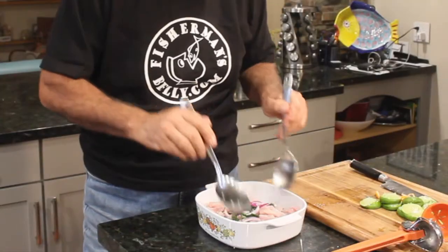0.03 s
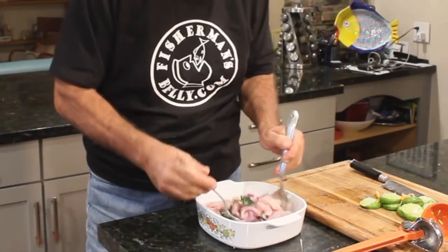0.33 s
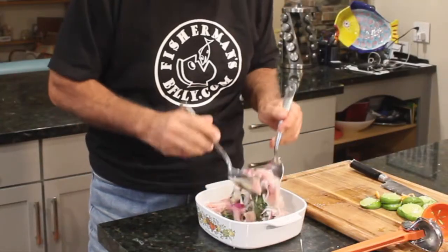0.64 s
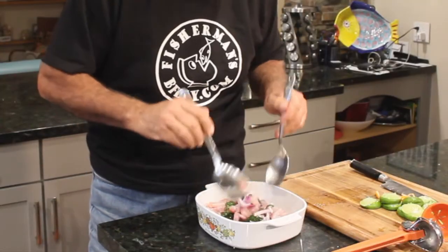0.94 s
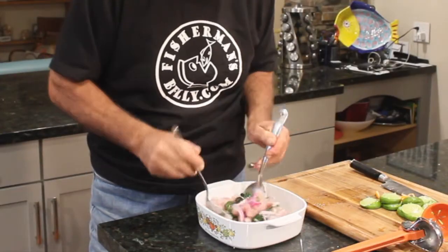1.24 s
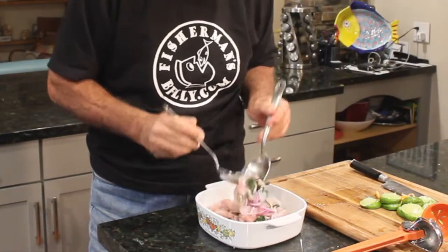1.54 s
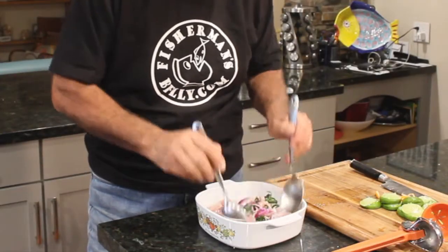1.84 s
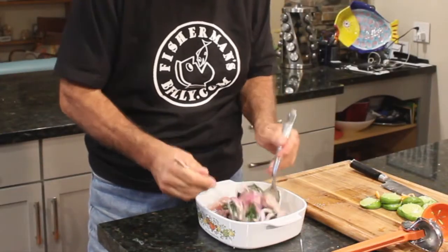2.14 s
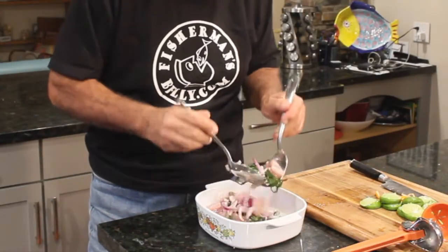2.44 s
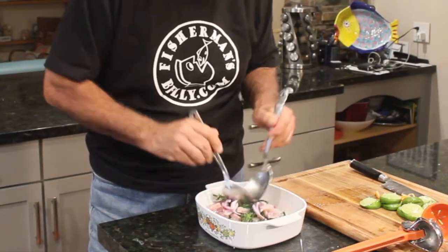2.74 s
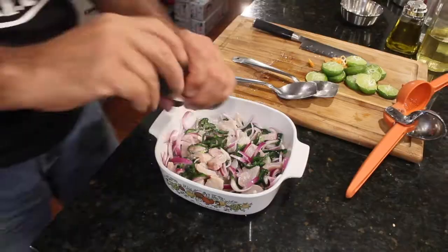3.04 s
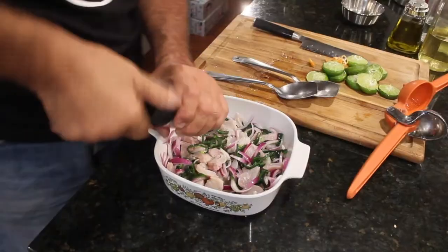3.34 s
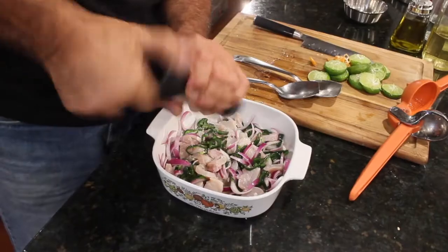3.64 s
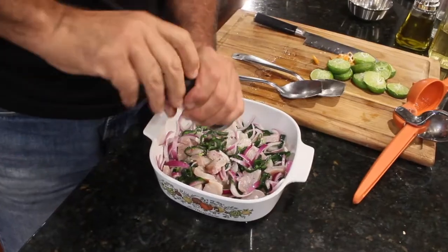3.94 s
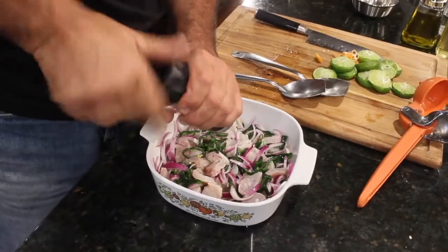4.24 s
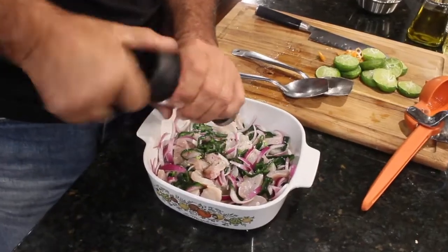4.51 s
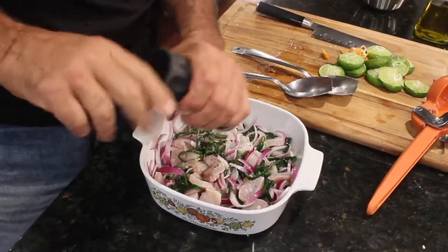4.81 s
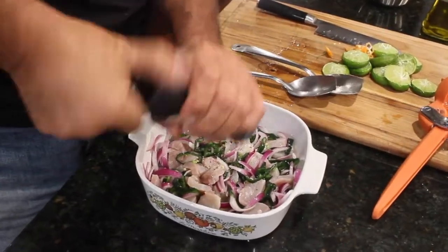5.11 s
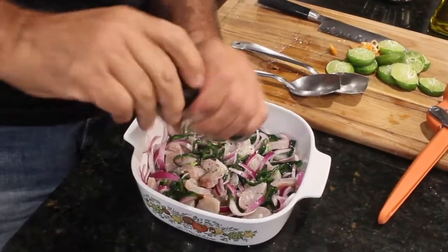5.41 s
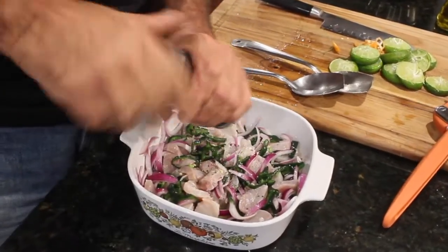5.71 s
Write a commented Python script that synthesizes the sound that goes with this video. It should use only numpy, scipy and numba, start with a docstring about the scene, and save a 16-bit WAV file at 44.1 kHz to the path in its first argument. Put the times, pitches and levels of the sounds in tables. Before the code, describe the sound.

Metal spoons toss a moist salad in a ceramic dish, heard from close by. Three sharp, ringing clinks stand out as the loudest sounds, at about 0.2, 1.1 and 1.9 seconds. The salad shifts with soft wet ticks, clearest around 0.4 seconds and fainter between 2.5 and 3 seconds.

From about 3.1 seconds a hand pepper mill is twisted six times, with further turns near 3.6, 4.1, 4.5, 5.1 and 5.5 seconds. Each twist is a brief, dry crunch with brittle snaps of peppercorns and a slightly hollow rattle from the mill. The turns vary in strength, and the last is a little softer and duller. A very faint, high patter of falling pepper follows each one. The kitchen adds a short reverberation, and quiet ventilation noise and a low electrical hum continue throughout.

```python
"""Tossing a salad and grinding pepper

Metal spoons clink three times on a ceramic dish, exciting its modes, as a moist salad is tossed.
A hand mill is then twisted six times: peppercorns fracture between its burrs and patter down.
The hard kitchen reverberates over ventilation and mains hum; a gain control ducks after each clink."""
import sys
import numpy as np
from scipy import signal
from scipy.fft import rfft, irfft
from scipy.io import wavfile
from numba import njit

SR = 44100
rng = np.random.default_rng(int(sys.argv[2]) if len(sys.argv) > 2 else 0)


def output_pcm(signal):
    """Save a mono or channel-first signal as 16-bit PCM at the path in sys.argv[1].

    Samples are clipped to [-1, 1] before scaling.
    """
    pcm = np.clip(np.atleast_2d(signal).T, -1, 1) * 32767
    wavfile.write(sys.argv[1], SR, np.round(pcm).astype(np.int16))


N = 258620
TOP_HZ = 15900  # upper band limit
# twists of the mill: start_s, length_s, bite_s, level_db, relative_shake_db, tilt_db_per_octave
TWIST_STROKES = [(3.143, 0.22, .018, -39.5, -16, -0.5), (3.605, 0.15, 0.066, -23.5, -9, 0),
                 (4.069, 0.11, 0.018, -22, -7.5, -0.2), (4.491, 0.12, 0.024, -33.5, -5, .5),
                 (5.065, 0.14, 0.021, -24.5, -11, 0.5), (5.484, 0.13, 0.043, -28, -12, -0.6)]


def undb(db):
    """Amplitude ratio: a factor of ten per 20 decibels."""
    return 10 ** (np.asarray(db) / 20)


def seconds(length_s):
    """Uniformly sampled time axis."""
    return np.arange(int(length_s * SR)) / SR


def unit(x):
    """Normalisation to an rms of 1."""
    return x / np.sqrt(np.mean(x ** 2))


def along(hz, points):
    """Interpolation of (frequency_hz, value) points on a logarithmic frequency axis."""
    point_hz, value = np.transpose(points)
    return np.interp(np.log(hz + 1), np.log(point_hz), value)


def colour(x, points, tilt_db=0, order=2048):
    """Minimum-phase filter with the given spectrum, tilted by tilt_db per octave above 1 kHz."""
    hz = np.fft.rfftfreq(order, 1 / SR)
    gain_db = along(hz, points) + tilt_db * np.log2(np.maximum(hz, 1000) / 1000)
    cepstrum = irfft(np.log(undb(gain_db)))
    cepstrum[1:order // 2] *= 2  # folding onto positive time makes the filter causal
    cepstrum[order // 2 + 1:] = 0
    response = irfft(np.exp(rfft(cepstrum)))
    return signal.fftconvolve(x, response)[:len(x)]


def fade(t, t60):
    """Exponential damping: 60 dB in t60 seconds."""
    return np.exp(-np.log(1000) * t / t60)


def swell(middle_s, half_width_s):
    """Gaussian envelope: a smooth rise and fall around a moment."""
    return np.exp(-((np.arange(N) / SR - middle_s) / half_width_s) ** 2)


def add(track, start_s, sound):
    """Superposition of a sound on a track."""
    i = int(start_s * SR)
    track[i:i + len(sound)] += sound[:N - i]


def grains(rate_hz, spread_db):
    """Shot noise: random impulses, a few larger than the rest."""
    size = undb(spread_db * np.minimum(rng.exponential(size=N), 3))
    return (rng.random(N) < rate_hz / SR) * size * rng.choice([-1, 1], N)


def background(air_db=-46):
    """Broadband ventilation noise and the mains harmonics of a kitchen appliance."""
    # spectrum of the ventilation: frequency_hz, gain_db
    air_spectrum = [(15, -39), (25, -12), (49, -12), (123, -12.5), (144, -13), (255, -7), (473, -9.5),
                    (654, -16), (981, -17), (1060, -26), (1150, -18), (2260, -27), (2660, -26), (5370, -32),
                    (15800, -38.5)]
    # mains harmonics: frequency_hz, rms_db
    harmonics = [(59.2, -55.5), (118.4, -60), (296.1, -64)]
    t = np.arange(N) / SR
    hum = sum(np.sqrt(2) * undb(db) * np.sin(2 * np.pi * (hz * t + rng.random())) for hz, db in harmonics)
    return hum + undb(air_db) * unit(colour(rng.standard_normal(N), air_spectrum))


def spoons(crack_db=-1, crack_t60_s=0.062, contact_s=0.00043):
    """Modal ringing: each blow excites the same modes, weighted by where it lands, over a brief crack."""
    # spoon blows on the dish: start_s, level_db, hardness_db, spot_index
    blows = [(0.179, 7, 2.5, 0), (1.0926, 8.5, 1.5, 1), (1.1055, -12, -11.5, 1), (1.8804, 9, 0.5, 2),
             (1.9075, -6.5, 11, 2)]
    # modes of dish and spoon: frequency_hz, t60_s, spot_0_db, spot_1_db, spot_2_db
    modes = [(874, 0.25, -24.5, -19, -36), (1064, 0.089, -29, -26, -15), (1560, 0.0653, -25, -17, -20),
             (1700, 0.056, -12.5, -3, -4.5), (1803, 0.24, -22, -19, -14), (2200, 0.075, -14, -26, -35),
             (2507, 0.24, -18, -33, -16), (2696, 0.076, -11, 0.5, -38), (2774, 0.12, -15, -12, -13),
             (2847, 0.15, -11, -13.5, -5), (3000, 0.17, -24, -33, -30), (3680, 0.082, -28, -17, -21),
             (3830, 0.028, 3, -2, -2.5), (3986, 0.21, -12.5, -17, -10.5), (4120, 0.27, -22, -11.5, -14.5),
             (4100, 0.11, -15, -10, -12), (5076, 0.046, -7, 0, 0), (5170, 0.07, -25.5, -5, -16),
             (5470, 0.25, -24.5, -22, -41), (5330, 0.044, -32.5, -5.5, -40),
             (6800, 0.14, -13.5, -13.5, -18), (7870, 0.24, -15.5, -17.5, -36),
             (8630, 0.14, -22, -15.5, -20), (10100, 0.13, -18, -19, -46), (11680, 0.087, -12.5, -14, -22),
             (13000, .14, -32, -37, -43), (13800, 0.13, -17, -30.5, -40), (14000, .1, -22, -18, -30)]
    # dense, short-lived vibration of the contact: frequency_hz, gain_db
    crack_spectrum = [(130, -41), (230, -10.5), (550, -10), (760, -1.5), (1800, -1), (3200, -3), (5500, -7),
                      (8000, -14), (15500, -20.5)]
    out, t = np.zeros(N), seconds(1)
    onset = 1 - np.exp(-t / contact_s)
    for start_s, level_db, hardness_db, spot in blows:
        ring = sum(undb(spot_db[spot]) * fade(t, t60) * np.sin(2 * np.pi * (hz * t + rng.random()))
                   for hz, t60, *spot_db in modes)
        crack = unit(colour(rng.standard_normal(len(t)), crack_spectrum)) * fade(t, crack_t60_s)
        add(out, start_s, undb(level_db) * (ring + undb(crack_db + hardness_db) * crack) * onset)
    return out


def salad():
    """Modulated shot noise: wet slices slide and part with tiny ticks, swelling with each spoonful."""
    # spoonfuls lifted and dropped: middle_s, half_width_s, level_db
    scoops = [(.4, .17, -40), (0.925, 0.088, -59.5), (2.49, 0.011, -48.5), (2.862, 0.08, -49.5),
              (3.045, 0.12, -57)]
    # spectrum of the wet ticks: frequency_hz, gain_db
    tick_spectrum = [(300, -12), (900, -1.5), (3500, -1.5), (6000, -8), (9000, -18.5), (12500, -14.5),
                     (15500, -16)]
    motion = sum(undb(db) * swell(middle_s, half_width_s) for middle_s, half_width_s, db in scoops)
    return motion * unit(colour(grains(rate_hz=1200, spread_db=1.0), tick_spectrum))


def peppercorns(snap_t60_s=0.012, split_s=0.00065, rattle_db=-17, rattle_t60_s=0.12):
    """Brittle fracture: a corn splits within a millisecond or two and leaves the housing rattling."""
    # the loudest corns breaking: start_s, level_db, tilt_db_per_octave
    fractures = [(3.1328, -3, 2), (3.207, -21, 3), (3.2158, -19, 2.5), (3.258, -18, 2), (3.2732, -6.5, 5.5),
                 (3.288, -15.5, -0.5), (3.332, -18, 2.5), (3.6414, -11.5, -1), (3.6557, -9, 5.5),
                 (3.6959, -15, 2.5), (3.729, -9, 3.5), (4.073, -25.5, 2.5), (4.0833, -20, 2),
                 (4.0916, -12, 0), (4.1176, -8.5, 1.5), (4.1263, -6, -0.5), (4.388, -33.5, -1),
                 (4.461, -36, -1), (4.5045, -28, 0), (4.5304, -21, 10), (4.5442, -14.5, 1),
                 (4.5518, -10, 3.5), (4.5709, -16, 0), (4.5852, -5.5, 1.5), (5.016, -29, -12),
                 (5.0701, -19.5, 0), (5.1209, -13, 2), (5.1512, -25, 2.5), (5.2043, -17.5, 0),
                 (5.536, -15.5, -2), (5.55, -15.5, -9), (5.601, -16, 1)]
    # snap of a whole corn, sharper than its crumbs: frequency_hz, gain_db
    snap_spectrum = [(150, -50), (320, -5), (550, -15.5), (730, -14.5), (1100, -3), (1750, 1.5), (2350, -2),
                     (3000, -2.5), (4300, -6), (5600, -10), (7300, -9.5), (10000, -19), (15500, -25)]
    out, t = np.zeros(N), seconds(0.1)
    onset = 1 - np.exp(-(t / split_s) ** 2)
    envelope = onset * (fade(t, snap_t60_s) + undb(rattle_db) * fade(t, rattle_t60_s))
    for start_s, level_db, tilt_db in fractures:
        snap = colour(rng.standard_normal(len(t)) * envelope, snap_spectrum, tilt_db)
        add(out, start_s, undb(level_db) * snap * np.linalg.norm(envelope) / np.linalg.norm(snap))
    return out


def effort(start_s, length_s, bite_s, swell_db=5, stop_t60_s=0.09):
    """Force envelope of one twist: the burrs bite, press hardest in mid-turn, then run out."""
    t = np.maximum(np.arange(N) / SR - start_s, 0)
    bite = np.minimum(t / bite_s, 1)
    arch = np.sin(np.pi * np.minimum(t / length_s, 1))
    run_out = fade(np.maximum(t - length_s, 0), stop_t60_s)
    return bite * undb(swell_db * (arch - 1)) * run_out


def burrs(crumb_db=-3, body_db=-2):
    """Forced vibration: fragments are crushed in a dense crackle whose jolts shake the hollow body."""
    # hollow modes of the mill: frequency_hz, t60_s, level_db
    body_modes = [(305, 0.14, -10), (368.5, 0.082, 2), (455, 0.06, 0.5), (544, 0.069, -7.5)]
    # response of the mill's housing: frequency_hz, gain_db
    housing = [(150, -60.5), (320, -5.5), (550, -16), (730, -14.5), (1100, -4.5), (1400, -4), (1800, 1.5),
               (2350, -5.5), (3100, -2.5), (4300, -7.5), (5600, -18), (7500, -11), (11000, -18),
               (15500, -28)]
    out, t = np.zeros(N), seconds(0.2)
    crumbs = grains(rate_hz=2000, spread_db=2.0)
    hollow = sum(undb(db) * fade(t, t60) * np.sin(2 * np.pi * hz * t) for hz, t60, db in body_modes)
    rumble = unit(signal.fftconvolve(crumbs, hollow)[:N])
    for start_s, length_s, bite_s, level_db, shake_db, tilt_db in TWIST_STROKES:
        crackle = unit(colour(crumbs, housing, tilt_db))
        crushing = undb(crumb_db) * crackle + undb(body_db + shake_db) * rumble
        out += undb(level_db) * effort(start_s, length_s, bite_s) * crushing
    return out


def sprinkle(fall_s=0.088, half_width_s=0.059, level_db=-55.5):
    """Random impacts: ground pepper patters on the salad a moment after each twist."""
    # spectrum of the patter: frequency_hz, gain_db
    patter_spectrum = [(3000, -22), (7000, -9), (11000, -2), (15500, -1)]
    landing = sum(swell(start_s + length_s + fall_s, half_width_s)
                  for start_s, length_s, *_ in TWIST_STROKES)
    return undb(level_db) * landing * unit(colour(grains(rate_hz=3000, spread_db=7.0), patter_spectrum))


def kitchen(x, wet_db, treble_db, build_s):
    """Reverberation: diffuse reflections from cupboards and tiles, in which the treble dies first."""
    # reverberation times of the room: frequency_hz, t60_s
    decay_times = [(200, 0.68), (900, 0.67), (2500, 0.61), (5000, 0.57), (8000, 0.49), (15000, 0.39)]
    t = seconds(0.7)
    noise, hz = rfft(rng.standard_normal(len(t))), np.fft.rfftfreq(len(t), 1 / SR)
    centres_hz = np.array(decay_times)[:, 0]
    tail = np.zeros(len(t))
    for (centre_hz, t60), share in zip(decay_times, np.eye(len(decay_times))):
        band = irfft(noise * along(hz, np.c_[centres_hz, share]), len(t))  # overlapping triangular bands
        tail += band * fade(t, t60) * undb(treble_db * centre_hz / TOP_HZ)
    tail *= 1 - np.exp(-t / build_s)
    return x + undb(wet_db) * signal.fftconvolve(x, tail / np.linalg.norm(tail))[:N]


def scene():
    """Superposition of tossing, then grinding, with their reverberation and the steady background."""
    tossing = kitchen(spoons() + salad(), wet_db=-9.5, treble_db=-11.5, build_s=0.0034)
    grinding = kitchen(peppercorns() + burrs() + sprinkle(), wet_db=-8.0, treble_db=-2.5, build_s=0.0015)
    return (tossing + grinding + background())[None]


@njit
def follow(x, attack, release):
    """Envelope detection: rectify, then smooth with separate rates for rise and fall."""
    out, level = np.empty(len(x)), 0.
    for i in range(len(x)):
        level += (abs(x[i]) - level) * (attack if abs(x[i]) > level else release)
        out[i] = level
    return out


def record(dry, ceiling_db=-6.0, attack_s=0.0023, release_s=0.28, ahead_s=0.0014):
    """Look-ahead limiting: the gain ducks after loud blows, their first peaks clip, the top is cut."""
    level = follow(dry[0], 1 / (attack_s * SR), 1 / (release_s * SR))
    level_ahead = np.interp(np.arange(N) + ahead_s * SR, np.arange(N), level)
    reduction = np.maximum(level_ahead / undb(ceiling_db), 1)
    limited = np.clip(dry / reduction, -1, 1)
    lowpass = signal.ellip(10, 0.2, 70, TOP_HZ, fs=SR, output="sos")
    return signal.sosfilt(lowpass, limited)


dry = scene()
out = record(dry)
output_pcm(out)
```